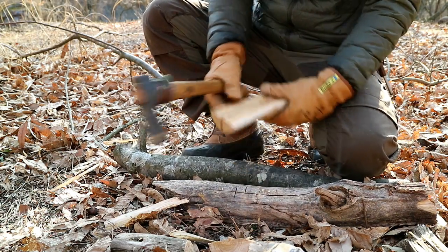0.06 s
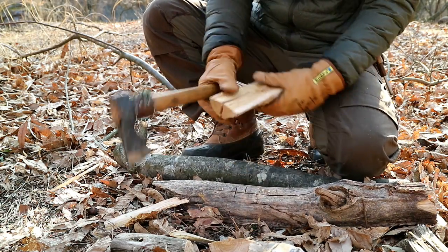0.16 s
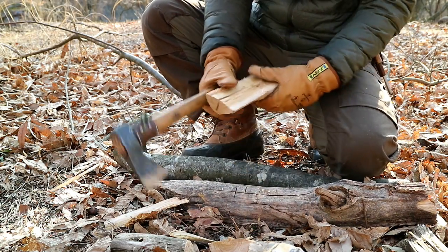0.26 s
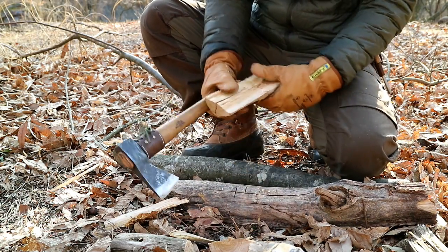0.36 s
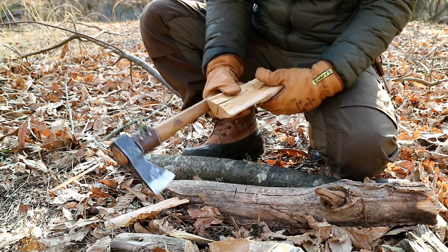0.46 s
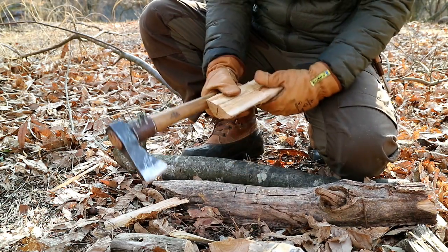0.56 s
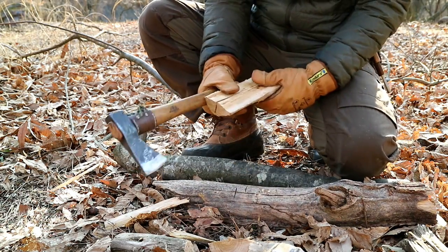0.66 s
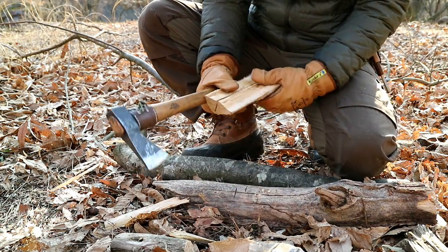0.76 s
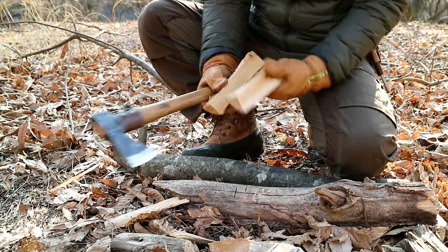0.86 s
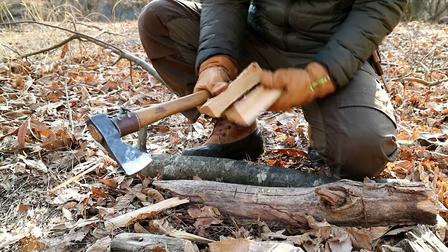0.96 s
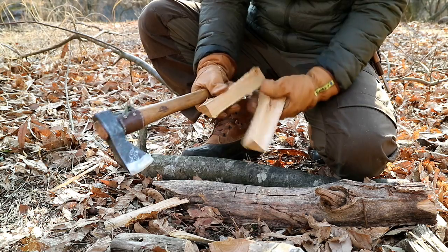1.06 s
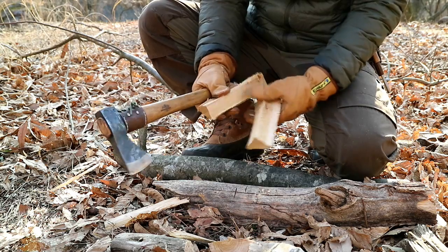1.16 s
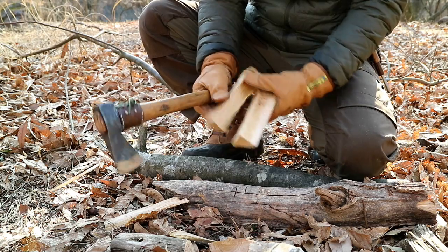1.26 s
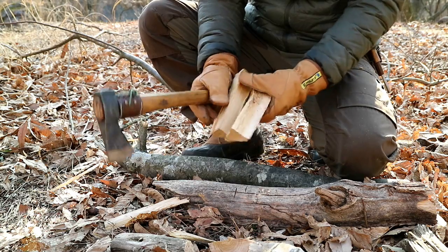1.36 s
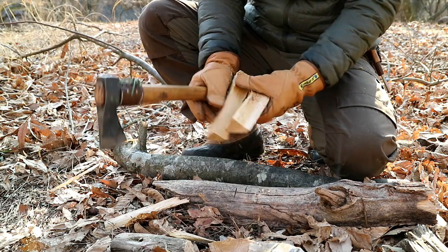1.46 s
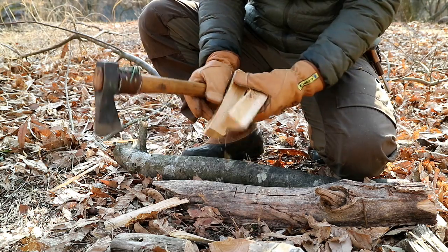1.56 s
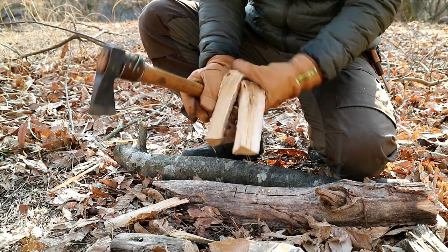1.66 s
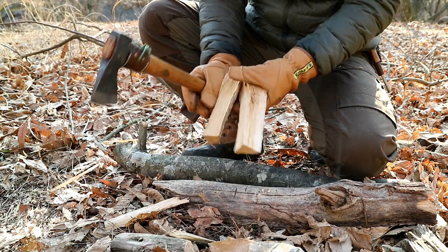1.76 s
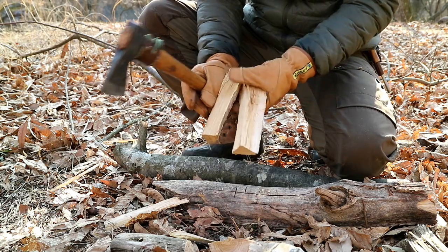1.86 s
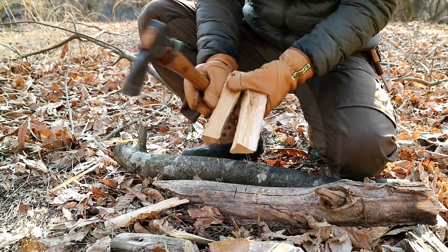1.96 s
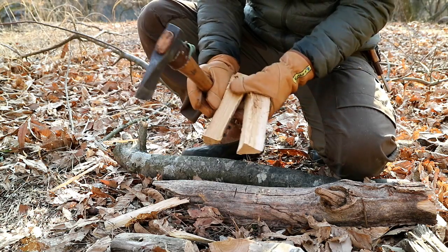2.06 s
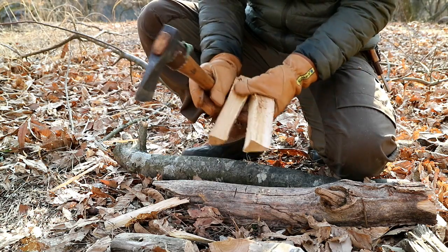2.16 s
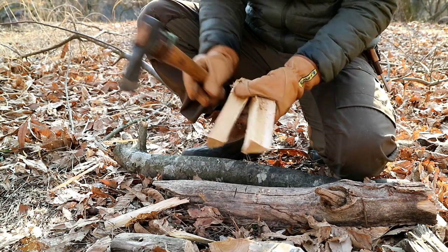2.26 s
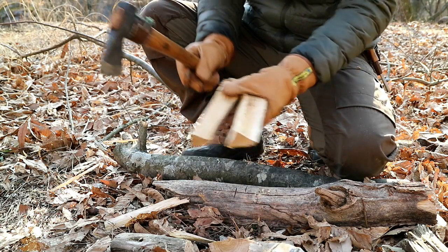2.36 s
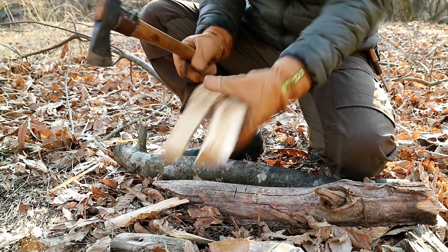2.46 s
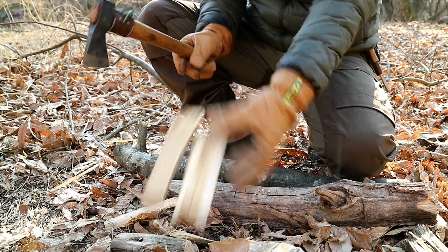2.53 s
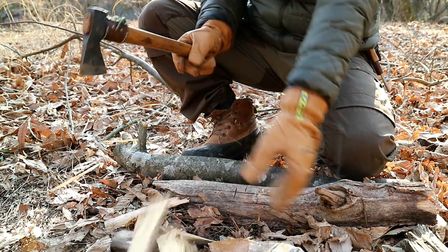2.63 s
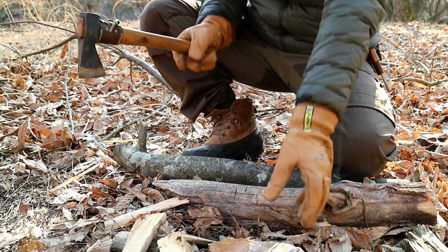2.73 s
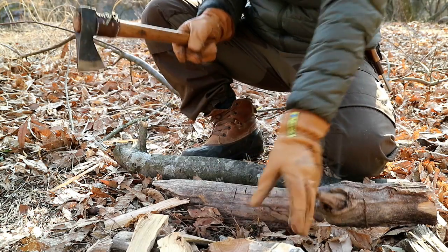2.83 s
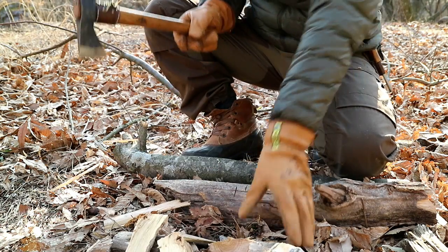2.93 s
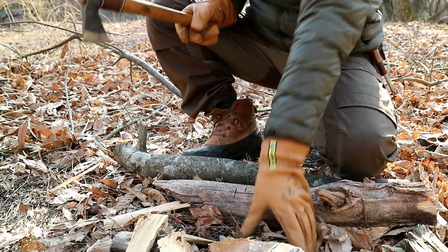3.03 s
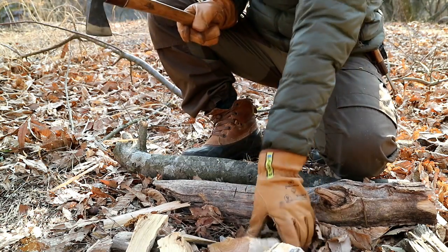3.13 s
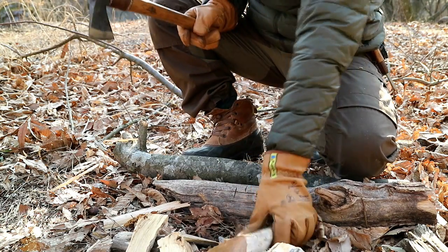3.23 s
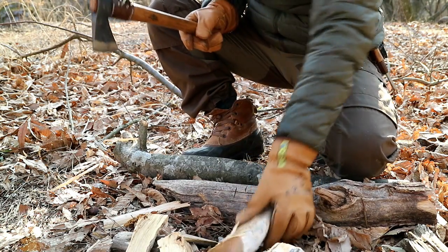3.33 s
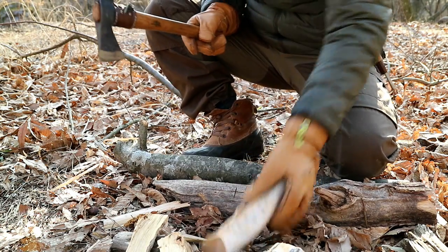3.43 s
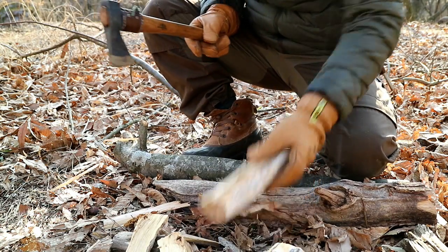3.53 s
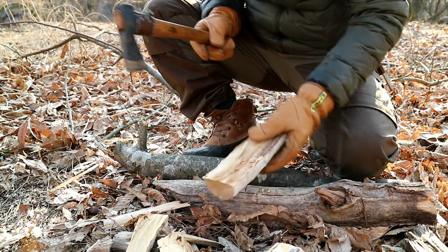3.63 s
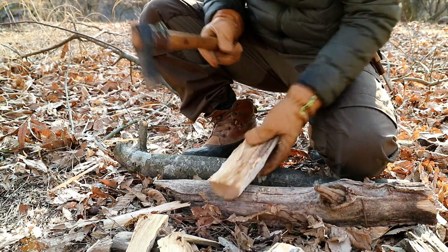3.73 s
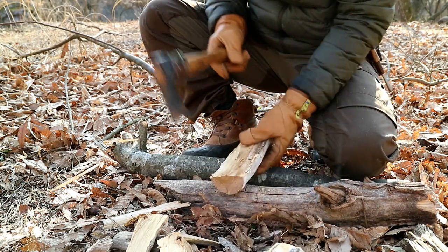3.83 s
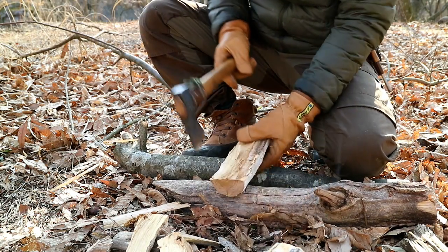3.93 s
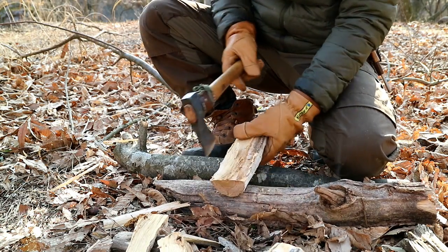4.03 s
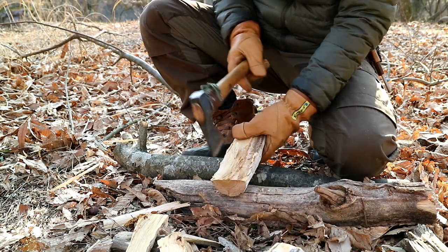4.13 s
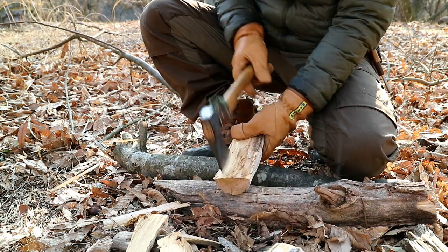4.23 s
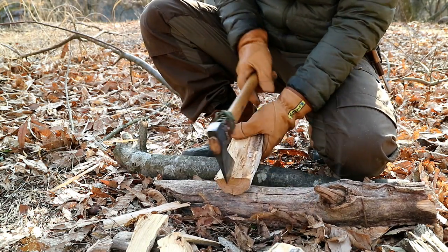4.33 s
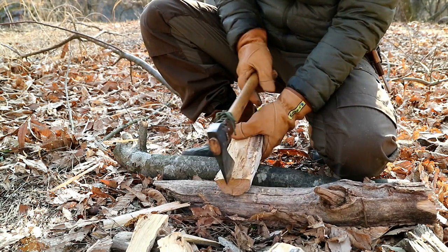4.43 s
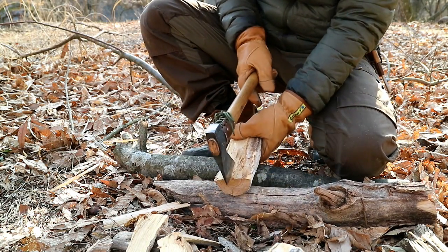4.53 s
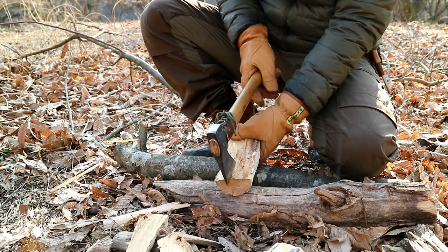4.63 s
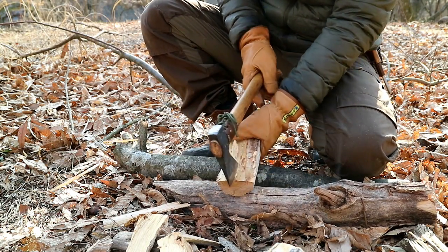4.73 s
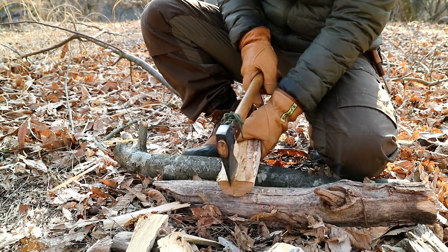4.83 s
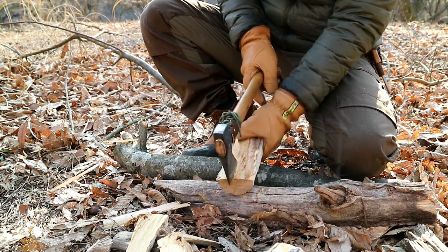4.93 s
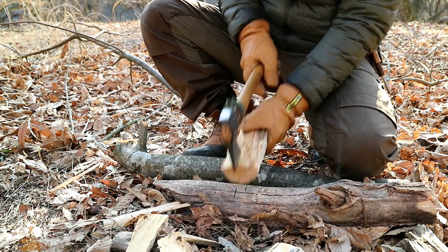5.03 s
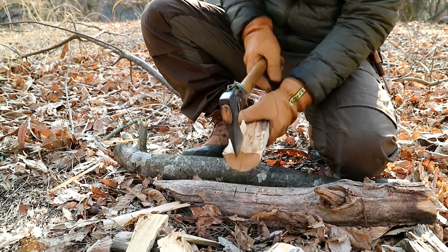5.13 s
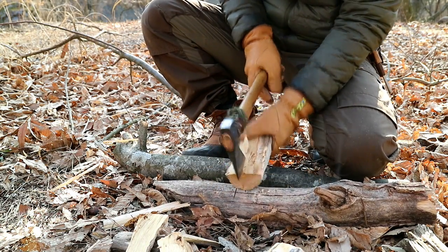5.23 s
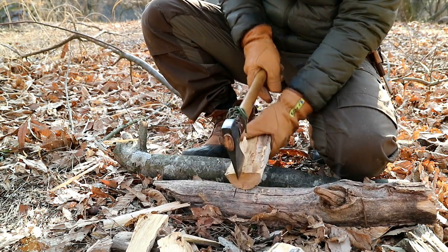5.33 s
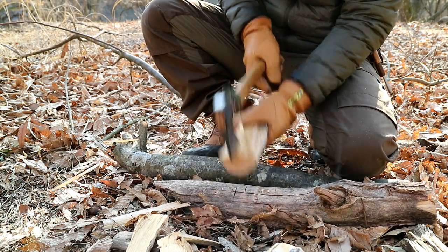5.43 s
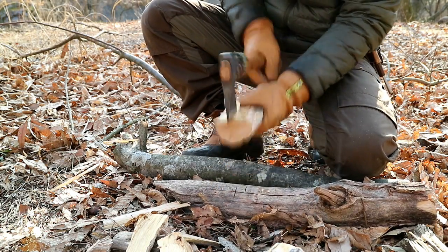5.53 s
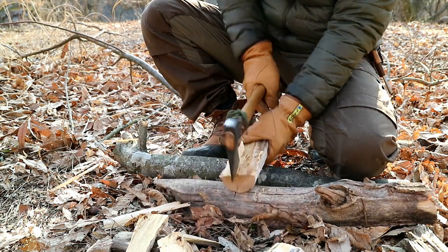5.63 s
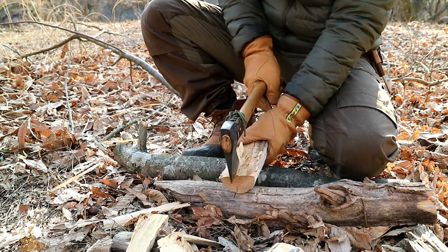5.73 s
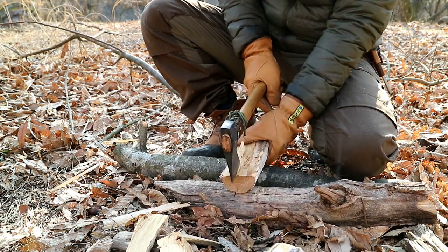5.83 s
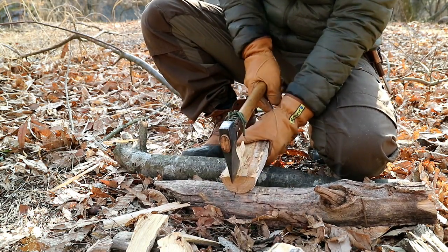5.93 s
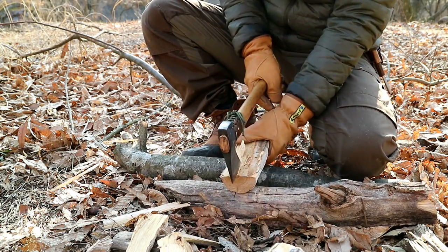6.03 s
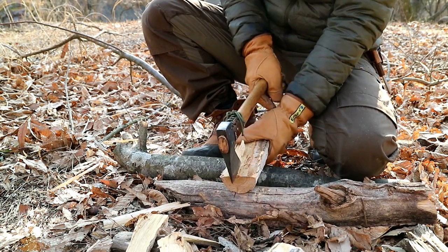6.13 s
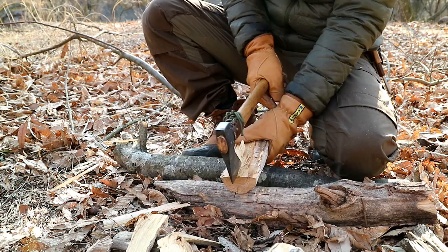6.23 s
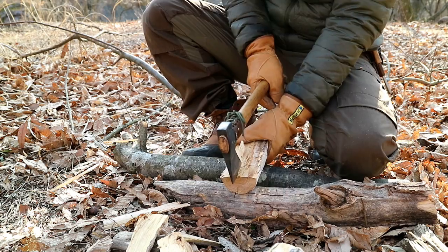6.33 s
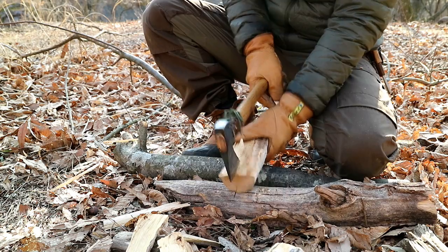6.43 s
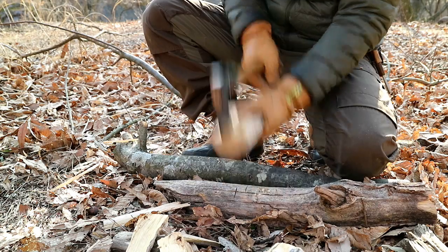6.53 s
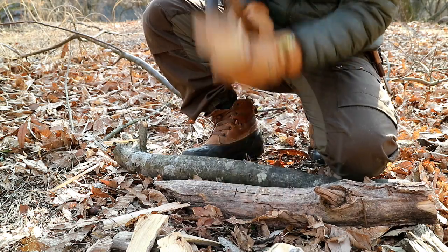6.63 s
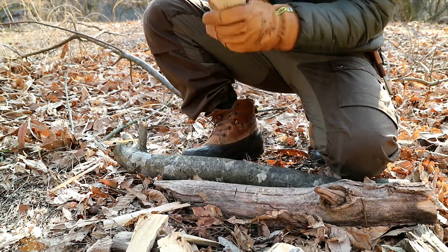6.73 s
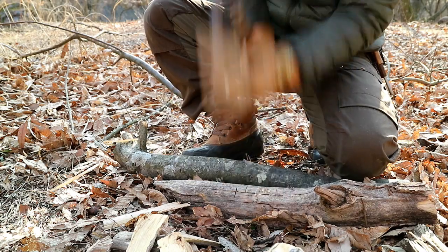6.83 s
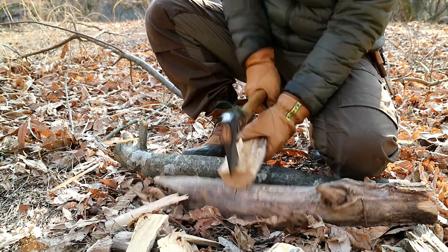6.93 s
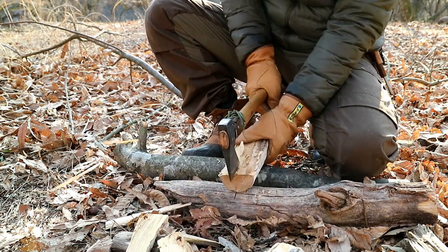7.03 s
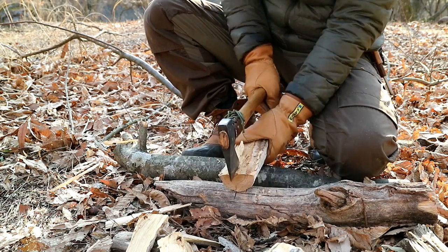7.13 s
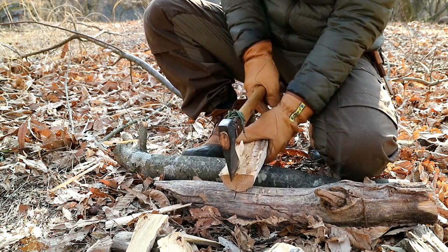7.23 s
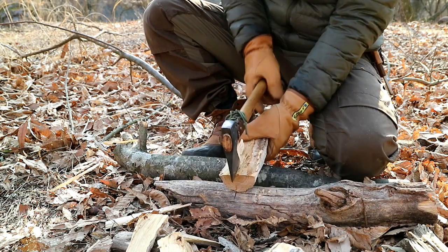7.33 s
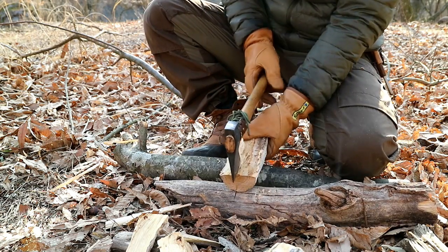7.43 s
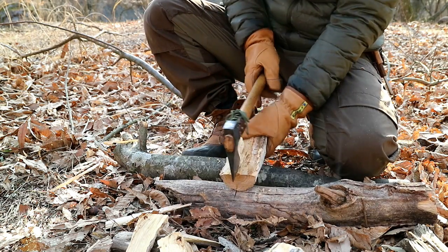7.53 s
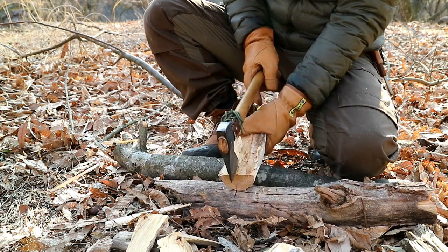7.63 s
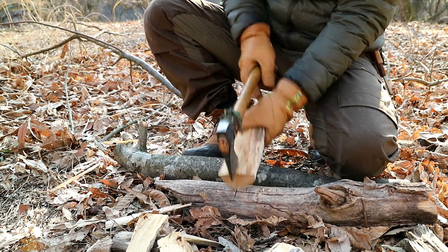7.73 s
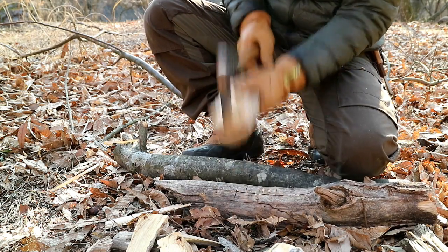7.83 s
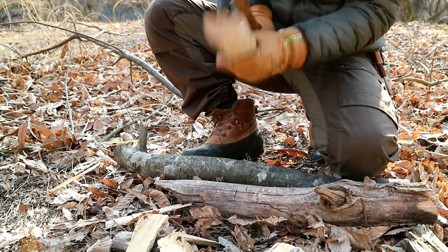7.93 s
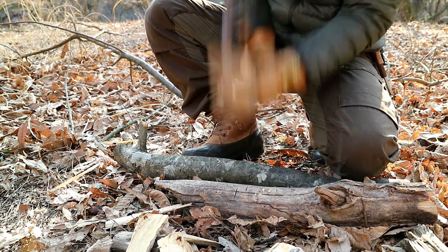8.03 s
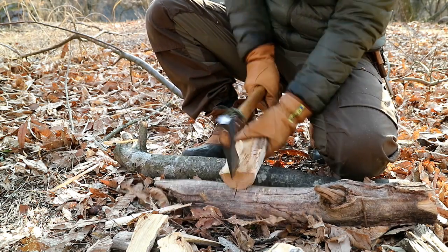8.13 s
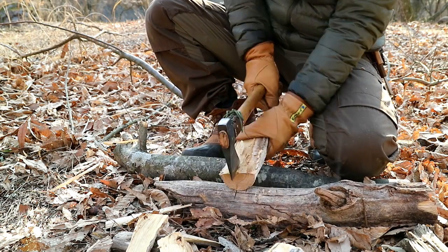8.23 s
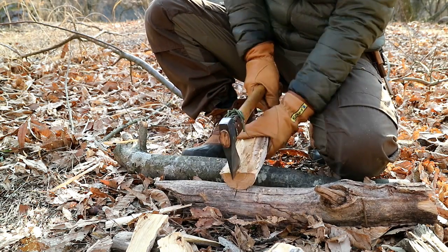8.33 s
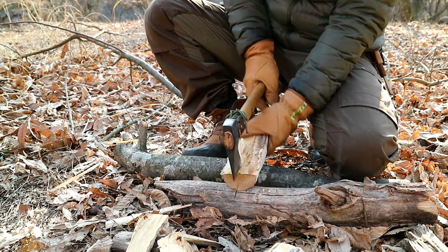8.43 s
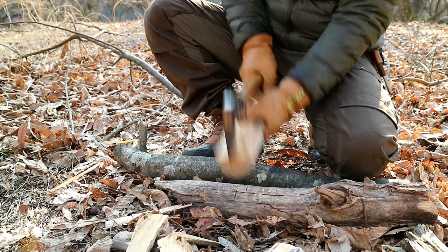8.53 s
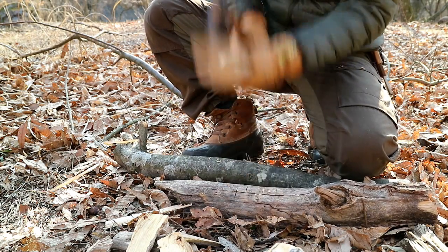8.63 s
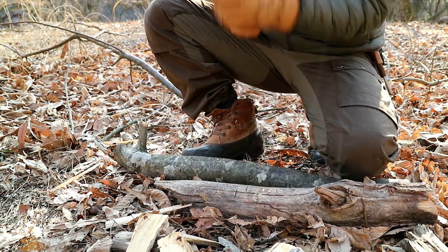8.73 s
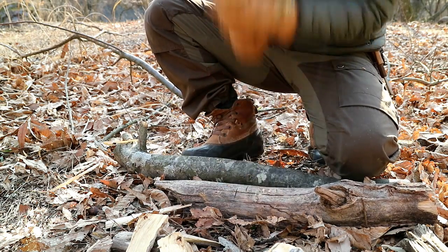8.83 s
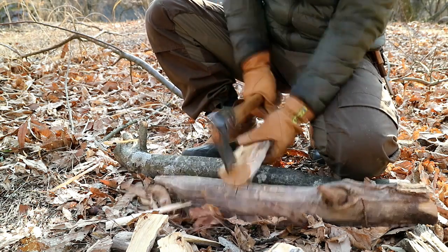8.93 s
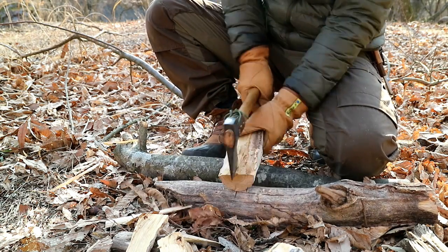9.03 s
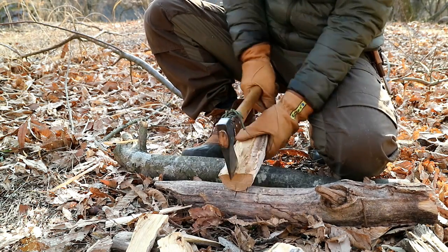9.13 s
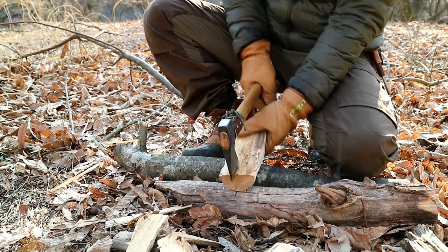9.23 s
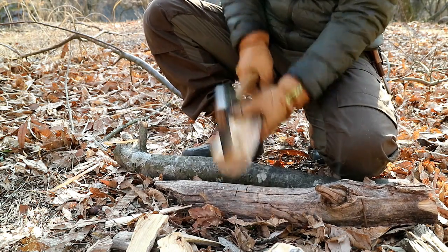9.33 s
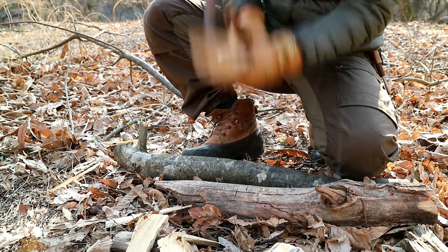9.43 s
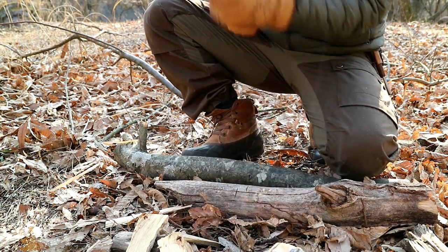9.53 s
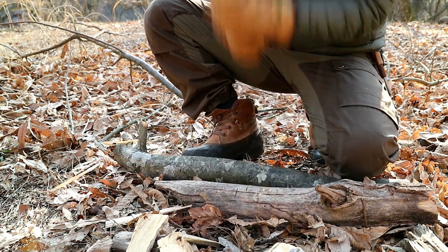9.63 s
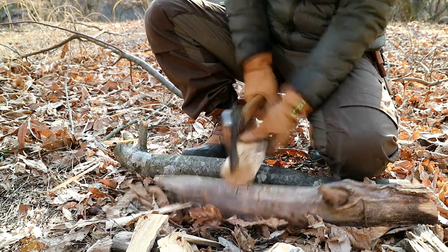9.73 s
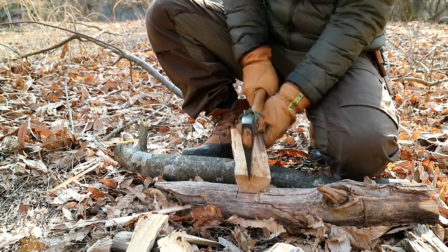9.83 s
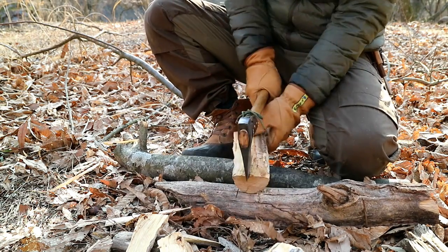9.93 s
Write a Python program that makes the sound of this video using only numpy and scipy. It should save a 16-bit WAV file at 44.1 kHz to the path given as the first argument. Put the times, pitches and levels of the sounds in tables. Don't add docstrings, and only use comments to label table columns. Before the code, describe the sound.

Split sticks crackle apart and clatter onto dry leaves, then a hatchet set in a billet knocks on a log, lightly then hard, over stream hiss.

```python
import sys
import numpy as np
from scipy import signal
from scipy.fft import rfft, irfft
from scipy.io import wavfile
from scipy.ndimage import uniform_filter1d

SR = 44100
rng = np.random.default_rng(int(sys.argv[2]) if len(sys.argv) > 2 else 0)


def transcribe(u):
    v = np.clip(np.atleast_2d(u).T, -1, 1)
    q = np.round(v * 32767).astype(np.int16)
    wavfile.write(sys.argv[1], SR, q)


def invert_db(x):
    u = np.asarray(x, float) / 20
    return 10 ** u


N = 439677

# start_s, blow_db, knock_hz, log_ring_db, crack_db
BLOWS = [
    (3.857, -4.5, 726, -15, -36),
    (4.433, -15, 650, -13, -25.5),
    (5.3777, -11.5, 730, -4.5, -25),
    (5.7504, 9, 851, -15.5, -25.5),
    (7.0296, 18, 1300, -21, -22),
    (8.2313, 12.5, 1055, -40.5, -28),
    (9.0716, 13.5, 1255, -16, -18.5),
    (9.15, -43, 905, 3.5, -28),
    (9.801, -37.5, 700, -23, -18),
    (9.8745, 9.5, 930, -27, -21.5),
]
# start_s, blow_db, knock_hz, log_ring_db
CHATTER = [(3.859, -13.5, 1820, -42), (5.7523, 1, 1200, -13.5), (5.7525, -0.5, 636, -29),
           (7.0349, 2, 514, -13), (8.2344, 8, 1302, -27), (8.2325, 1, 2910, -25), (8.2345, 0.5, 803, -23.5),
           (9.0715, 4, 3780, -24), (9.0755, -4, 600, -18.5), (9.077, 0, 1670, -17), (9.8743, 5, 3270, -34),
           (9.877, -5.5, 784, -14.5), (9.88, -9.5, 1780, -4.5)]
SEAT_LEVELS = [
    -14,
    -10.5,
    -1.5,
    -1.5,
    -0.5,
    -4,
]
# pitch_hz, level_db, fall_60db_s, left_over_right_db
LOG_MODES = [(242, -1, 0.016, 8), (339.4, -6, 0.018, -0.5), (624, -3, 0.051, -12.5), (859, -1, 0.042, 21),
             (905.3, 1, 0.078, -6.5), (1192, -5, 0.047, 11), (1483, 2, 0.021, 0), (1730, -4, 0.044, 14)]
# pitch_hz, level_db, fall_60db_s
HEAD_MODES = [(2479, -9, 0.0094), (3446, -0.5, 0.0027), (4330, -6.5, 0.0034), (5260, -13, 0.0085),
              (7500, -19.5, 0.0055)]
# pitch_hz, level_db, fall_60db_s
GROUND_MODES = [(69, -28.5, 0.7), (88, -17.5, 0.26), (125, -18.5, .25), (175, -19.5, .15)]
# start_s, peak_db, brightness_db_per_octave, length_ms
TEARS = [
    (.9102, -18, 14, 15),
    (0.9154, -9.5, 15, 2.8),
    (.9247, -14, 5, 0.76),
    (.9265, -6.5, 7, 4),
    (.9315, -7, 21, 2.7),
    (.9365, -31, -12, 4),
    (1.0187, -11, -6.5, 0.66),
]
# pitch_hz, level_db, fall_60db_s
HALF_MODES = [(767, 1.5, 0.016), (1200, -8, 0.0092), (1700, -2, 0.0085), (3100, -10, 0.018),
              (3360, 10, 0.0073), (3960, 3, 0.0062), (6000, -4, 0.0017)]
# start_s, peak_db, second_stick_share_0_to_1, contact_ms
DROPS = [
    (2.7582, -5, 0.19, 0.1),
    (2.7615, -9.5, 0, 0.76),
    (2.7685, -17, 0.3, 1.1),
    (2.7797, -14, 1, .25),
    (2.783, -12, 0.23, 0.11),
    (2.787, -22, 0.4, 0.07),
    (2.8018, -4, 0.4, 2.15),
    (2.858, -35, 0.2, 0.51),
]
# pitch_hz, level_db, fall_60db_s
STICK_MODES = [
    [(1007, 0, 0.015), (1300, 10.5, 0.0038), (2375, 5, 0.069), (2832, -7, .024), (4500, -23.5, 0.0092)],
    [(700, -24, 0.026), (1120, 3, 0.014), (2170, 6.5, .035), (3200, -19, 0.0043), (5500, -30, 0.008)],
]
# start_s, peak_db, pitch_hz, length_ms
SNAPS = [(1.0221, -14.5, 6000, 0.65), (.95, -37, 5000, 8), (.99, -35, 1200, 4.6),
         (1.7635, -18.5, 5260, 2.3), (2.549, -17.5, 3660, 4.4), (3.21, -22.5, 7500, 7.9),
         (3.259, -24.5, 5470, 2.9), (3.307, -24, 1300, 24), (3.36, -22, 1300, 15), (3.42, -17, 4210, 3.7),
         (5.2, -22, 3000, 2.8), (7.172, -31, 4200, 6.6), (8.246, -38.5, 4500, 3), (8.293, -50, 6000, 3),
         (8.308, -27, 5500, 3), (9.351, -35, 5020, 8.9), (9.946, -46, 5000, 3)]
# loudest_s, level_over_hiss_db, swell_20db_s, fade_20db_s
RUSTLES = [
    (.93, 10.5, 0.037, 0.095),
    (2.765, 18.5, 0.0092, 0.17),
    (3.05, 1.5, 0.13, 0.1),
    (3.24, 5, 0.21, 0.75),
    (3.45, -10, 0.22, 0.013),
    (9.36, 3, 0.0503, .06),
]
# frequency_hz, level_db_per_hz
LEAF_COLOUR = [(300, -13.5), (1200, 3.5), (3000, -6.5), (7500, -7.5), (11000, -19), (16000, -24)]
# delay_s, level_db, left_over_right_db
TRUNK_ECHOES = [
    (0.016, -60.5, 2.5),
    (0.035, -39.5, 15.5),
    (.056, -32, -3.5),
    (0.079, -42.5, -6),
]
# frequency_hz, fall_60db_s
WOODS_DECAY = [(100, 0.64), (300, 0.13), (1000, 0.61), (2200, 0.5), (4000, 0.1), (8000, 0.44)]
# frequency_hz, level_db
WOODS_COLOUR = [(150, -4), (500, -5), (900, -1), (1500, 1), (2300, -6.5), (4000, -12), (8000, -18)]
# start_s, length_s, from_hz, to_hz, level_db
CHIRPS = [
    (7.935, 0.067, 8100, 7500, -54),
    (8.73, .04, 7700, 7400, -63),
]
# frequency_hz, level_db_per_hz
HISS_COMMON = [(15, -60.5), (25, -25), (49, -24), (82, -18), (267, -9), (297, -9), (433, -10.5), (848, -2),
               (1170, -0.5), (1800, -3.5), (1950, -5.5), (4380, -10.5), (9300, -25.5), (15500, -31.5)]
# frequency_hz, opposed_over_common_db
HISS_OPPOSED = [(60, 8.5), (110, 10), (200, 12.5), (380, 9.5), (700, 5.5), (1290, 1.5), (2380, 1.5),
                (4400, -3), (8120, 1.5), (15000, 3.5)]
# frequency_hz, left_over_right_db
HISS_LEAN = [(60, -2), (240, 1), (950, 3.0), (3770, 4.5), (15000, -1)]
# start_s, step_db, wait_before_climb_s
DUCKS = [
    (2.76, -6, .3),
    (5.752, -11.5, .28),
    (7.031, -12, .33),
    (8.232, -10, .33),
    (9.073, -9.5, .6),
    (9.876, -5, .3),
]
# from_s, to_s
BUSY_SPANS = [
    (.912, 1.03),
    (2.77, 2.92),
    (3.17, 3.5),
]

CONTACT_CYCLES, LONGEST_MS = 0.73, 0.88
CHATTER_CRACK_DB = -31.5
SEAT_S, SEAT_HZ = 0.00361, 290
GROUND_LAG_S = .03
SWING_DB, SWING_S, HARD_DB = -4.5, 0.62, 5
PORT_LAG = 2
START_DB, CEILING_DB, CLIMB_DB_PER_S, FALL_S = -55.5, -38, 10.5, 0.054
LOST_HZ, LOST_BEFORE_S, LOST_AFTER_S, SPARED_S = (10300, 14500), .085, .11, .009
EDGE_HZ = 15800


def evened(x):
    return x / np.sqrt(np.mean(x ** 2) + 1e-20)


def read(points, hz):
    f, value = np.transpose(points)
    return np.interp(np.log(hz + 1), np.log(f + 1), value)


def add(mix, s, sound):
    part = mix[:, round(s * SR):][:, :sound.shape[1]]
    part += sound[:, :part.shape[1]]


def lean(db):
    return invert_db(np.array([[db / 2], [-db / 2]]))


def ring(hz, db, t60):
    t = np.arange(SR // 3) / SR
    return invert_db(db - 60 * t / t60) * np.sin(2 * np.pi * hz * t)


def pressed(sound, contact_ms):
    t = np.arange(128) / SR
    push = np.sin(np.pi * np.clip(t / (contact_ms * 0.00079), 0, 1)) ** 2 + 1e-9
    return signal.lfilter(push / push.sum(), [1], sound)


def radiated(x, hz):
    return signal.sosfilt(signal.butter(2, hz, "high", fs=SR, output="sos"), x)


def contacts():
    weighted = [s for s, db, *_ in BLOWS[2:] if db > -20]
    seats = [(s + SEAT_S, db, SEAT_HZ, -14, -36) for s, db in zip(weighted, SEAT_LEVELS)]
    chatter = [(*row, CHATTER_CRACK_DB) for row in CHATTER]
    rows = []
    for s, db, hz, ring_db, crack_db in BLOWS + seats + chatter:
        contact_ms = min(CONTACT_CYCLES * 1e3 / hz, LONGEST_MS)
        rows.append((s, db, contact_ms, hz, ring_db, crack_db))
    return rows


def blows():
    out, thuds, t = np.zeros((2, N)), np.zeros((2, N)), np.arange(SR // 3) / SR
    log = sum(lean(pan_db) * ring(hz, db, t60) for hz, db, t60, pan_db in LOG_MODES)
    head = sum(ring(*mode) for mode in HEAD_MODES)
    thud = np.array([[1.], [-.75]]) * sum(ring(*mode) for mode in GROUND_MODES)
    thud = thud * np.minimum(t / GROUND_LAG_S, 1) ** 2
    held = np.minimum(t / 0.00062, 1) * np.exp(-(t / np.array([[.0035], [.004]])) ** 2.2)
    rows = contacts()
    noises = rng.standard_normal((len(rows), 3, 600))
    for (s, blow_db, contact_ms, hz, ring_db, crack_db), noise in zip(rows, noises):
        port_hz = hz * np.array([[1.02], [.98]])
        knock = held * np.sin(2 * np.pi * port_hz * t)
        grit = (0.72 * noise[:2] + 2.85 * noise[2]) * invert_db(-60 * t[:600] / 0.01)
        crack = signal.fftconvolve(grit, head[None, :2000], axes=1) * 0.57
        crack[:, :600] += 1.1 * grit
        add(out, s, invert_db(blow_db) * pressed(knock + invert_db(ring_db) * log, contact_ms))
        add(out, s, invert_db(blow_db + crack_db) * crack)
        if hz == SEAT_HZ:
            add(thuds, s, invert_db(0.4 * blow_db - 3.5) * thud)
    return radiated(out, 280) + thuds


def tears():
    out, t = np.zeros((2, N)), np.arange(600) / SR
    noises = rng.standard_normal((len(TEARS), 3, 600))
    for (s, db, bright_db, ms), noise in zip(TEARS, noises):
        shape = np.minimum(t / (ms * 3e-4), 1) * np.exp(-t / (ms * 5e-4))
        grit = (.4 * noise[:2] + noise[2]) * shape
        halves = sum(ring(hz, mode_db + bright_db * np.log2(hz / 2000), t60)
                     for hz, mode_db, t60 in HALF_MODES)
        burst = signal.fftconvolve(grit, halves[None, :2000], axes=1)
        burst[:, :600] += 0.51 * np.diff(grit, prepend=0)
        add(out, s, invert_db(db) * lean(2.8) * burst / abs(burst).max())
    return radiated(out, 580)


def drops():
    out = np.zeros((2, N))
    first, second = (sum(lean(5 * (hz < 1500)) * ring(hz, db, t60) for hz, db, t60 in modes)
                     for modes in STICK_MODES)
    for s, db, share, contact_ms in DROPS:
        both = (1 - share) * first + share * second
        add(out, s, invert_db(db) * pressed(both, contact_ms))
    return radiated(radiated(out, 500), 500)


def snaps():
    out, t = np.zeros((2, N)), np.arange(1500) / SR
    noises = rng.standard_normal((len(SNAPS), 3, 1500))
    for (s, db, hz, ms), noise in zip(SNAPS, noises):
        shape = np.exp(-t / (ms * 4e-4)) * np.minimum(t / (ms * 1.5e-4), 1)
        grit = (.5 * noise[:2] + noise[2]) * shape
        body = signal.iirpeak(hz, 1.9, SR)
        burst = signal.lfilter(*body, signal.lfilter(*body, grit)) + 0.22 * grit
        add(out, s, invert_db(db) * lean(1.87) * burst / abs(burst).max())
    return radiated(out, 390)


def rustle():
    t, level = np.arange(N) / SR, np.zeros(N)
    swings = [(s - .01, SWING_DB, SWING_S, .003) for s, db, *_ in BLOWS if db > HARD_DB]
    for s, db, swell, fade in RUSTLES + swings:
        level += invert_db(db - 20 * np.where(t < s, (s - t) / swell, (t - s) / fade))
    level = level * invert_db(gain_db())
    sizes = invert_db(5.7 * np.minimum(rng.exponential(1, (3, N)), 5))
    grains = sizes * (rng.random((3, N)) < 3000 / SR)
    grains = grains * rng.choice([-1., 1.], (3, N))
    ports = grains[:2] + 0.24 * grains[2]
    colour = invert_db(read(LEAF_COLOUR, np.fft.rfftfreq(N, 1 / SR)))
    return level * evened(irfft(rfft(ports) * colour, N))


def trunk_echoes(near):
    out = np.zeros((2, N))
    band = signal.butter(2, [700, 2200], "band", fs=SR, output="sos")
    dulled = signal.sosfilt(band, near)
    bark = rng.standard_normal((2, 500)) * np.hanning(500)
    dulled = signal.oaconvolve(dulled, bark / np.linalg.norm(bark[0]), axes=1)[:, :N]
    for s, db, pan_db in TRUNK_ECHOES:
        add(out, s, invert_db(db) * lean(pan_db) * dulled)
    return out


def woods(x):
    taps = np.zeros((2, SR // 2))
    at = np.arange(200, SR // 2 - 20, 20) + rng.integers(0, 20, (2, (SR // 2 - 201) // 20))
    np.put_along_axis(taps, at, rng.choice([-1., 1.], at.shape), 1)
    hz, t, z = signal.stft(taps, SR, nperseg=256)
    t60 = np.maximum(read(WOODS_DECAY, hz), .02)[:, None]
    fading = invert_db(read(WOODS_COLOUR, hz)[:, None] - 60 * t / t60)
    tail = signal.istft(z * fading, SR, nperseg=256)[1]
    return signal.fftconvolve(x, tail / np.linalg.norm(tail[0]), axes=1)[:, :N]


def bird():
    out = np.zeros((2, N))
    for s, length, from_hz, to_hz, db in CHIRPS:
        hz = np.linspace(from_hz, to_hz, round(length * SR))
        whistle = np.hanning(len(hz)) * np.sin(2 * np.pi * np.cumsum(hz) / SR)
        add(out, s, invert_db(db) * lean(0) * whistle)
    return out


def shaped(colour_db, patchy_db):
    a, b = rng.standard_normal((2, 2, N // 256 + 5, 513)).transpose(0, 1, 3, 2)
    patches = rng.standard_normal((N // 256 + 5, 513)).T
    patches = evened(uniform_filter1d(uniform_filter1d(patches, 12, 0), 14, 1))
    return (a + 1j * b) * invert_db(colour_db[:, :, None] + patchy_db * patches)


def hiss():
    hz = np.fft.rfftfreq(1024, 1 / SR)
    mid_db = read(HISS_COMMON, hz)
    side_db = mid_db + read(HISS_OPPOSED, hz)
    mid, side = shaped(np.array([mid_db, side_db]), patchy_db=1.14)
    tilt = invert_db(read(HISS_LEAN, hz)[:, None] / 2)
    ports = np.array([(mid + side) * tilt, (mid - side) / tilt])
    x = signal.istft(ports, nperseg=1024, noverlap=768)[1][:, :N]
    return x / np.std(x.mean(0)) * invert_db(1.0 + gain_db())


def gain_db():
    t = np.arange(0, N + 64, 64) / SR
    level = np.minimum(START_DB + CLIMB_DB_PER_S * t, CEILING_DB)
    for s, step_db, wait in DUCKS:
        after = np.maximum(t - s, 0)
        low = np.interp(s, t, level) + step_db * (1 - np.exp(-3 * after / FALL_S))
        climbed = low + CLIMB_DB_PER_S * np.maximum(after - wait, 0)
        level = np.where(t > s, np.minimum(climbed, CEILING_DB), level)
    return np.interp(np.arange(N) / SR, t, level)


def scene():
    near = blows() + drops() + snaps() + tears()
    shaken = uniform_filter1d(abs(near), size=40) * rng.standard_normal((2, N))
    far = invert_db(-38) * woods(0.2 * near + 1.3 * shaken) + trunk_echoes(near)
    near[1] = np.roll(near[1], shift=PORT_LAG)
    return near + far + rustle() + bird()


def overloaded(dry):
    over = np.convolve(abs(dry).max(0) > 1.5, np.ones(SR // 8))[:N] > 0
    turn_down = -7. * np.roll(over, shift=200)
    turned_db = signal.lfilter([1 / 300], [1, 1 / 300 - 1], turn_down)
    return np.clip(dry * invert_db(turned_db), -.98, .98)


def without_lost_band(x):
    hz, t, z = signal.stft(x.mean(0), SR, nperseg=256)
    busy = sum((t > a) * (t < b) for a, b in BUSY_SPANS)
    for s in [s for s, db, *_ in BLOWS if db > HARD_DB]:
        around = (t > s - LOST_BEFORE_S) * (t < s + LOST_AFTER_S)
        busy += around * (abs(t - s - .003) > SPARED_S)
    lost = busy * ((hz > LOST_HZ[0]) * (hz < LOST_HZ[1]))[:, None]
    return x - signal.istft(z * lost, SR, nperseg=256)[1][:N]


def top_cut(x):
    return signal.sosfilt(signal.butter(12, 16250, fs=SR, output="sos"), x)


def record(dry):
    stage = signal.butter(1, [45, 11000], "band", fs=SR, output="sos")
    mix = signal.sosfilt(stage, overloaded(dry)) * 1.037 + hiss()
    mix = without_lost_band(mix)
    mix = signal.oaconvolve(mix, signal.firwin(255, EDGE_HZ, fs=SR)[None], "same")
    return top_cut(mix)


dry = scene()
out = record(dry)
transcribe(out)
```